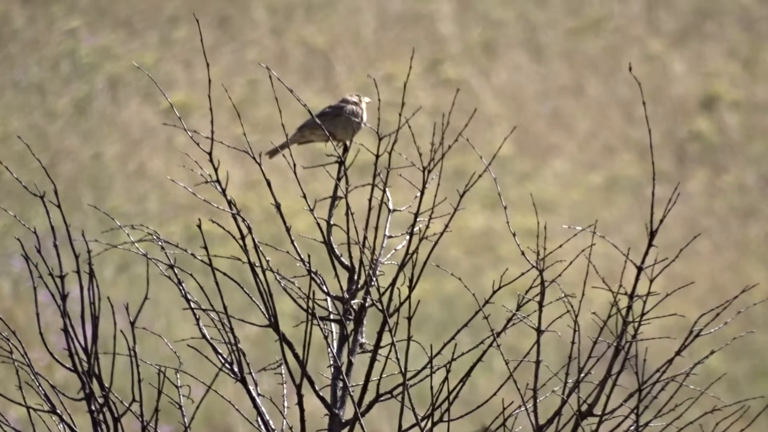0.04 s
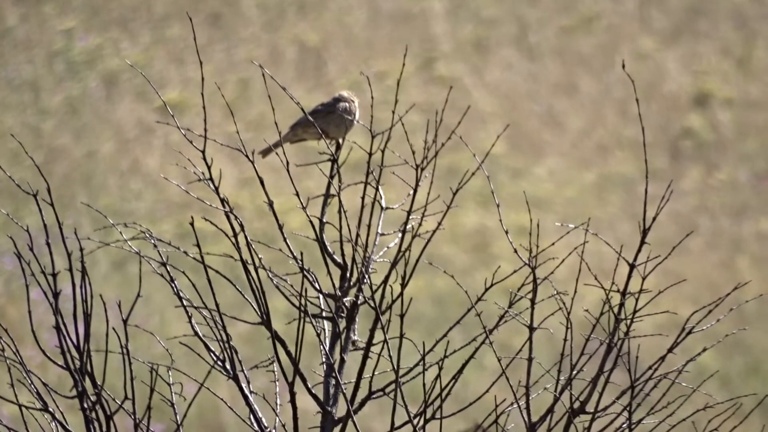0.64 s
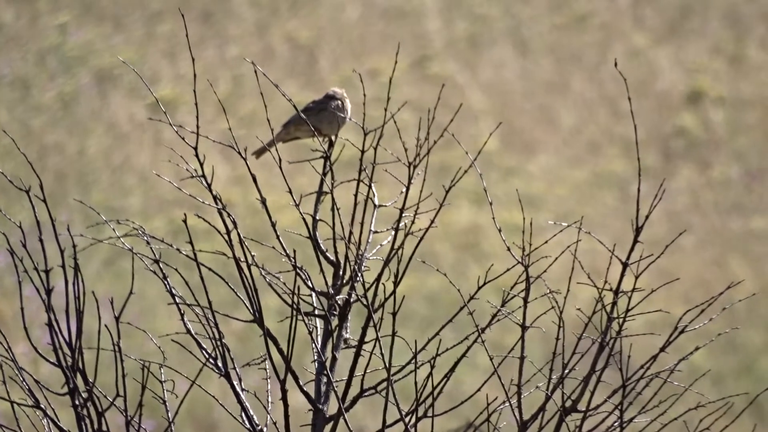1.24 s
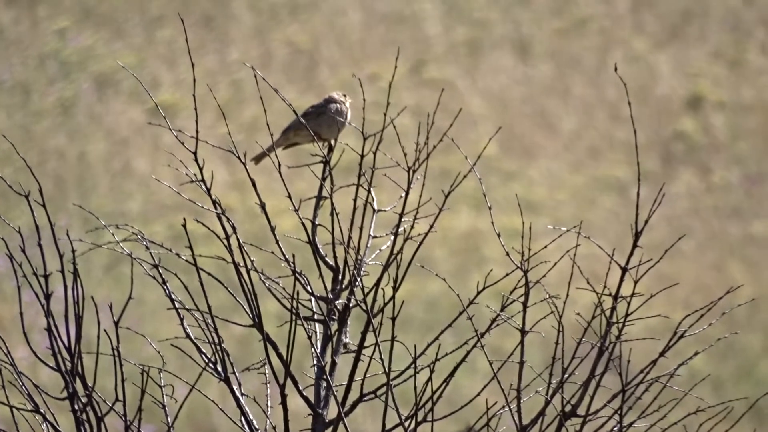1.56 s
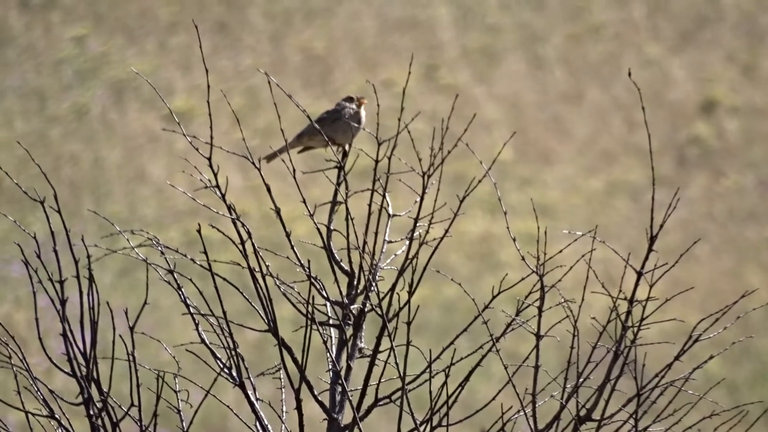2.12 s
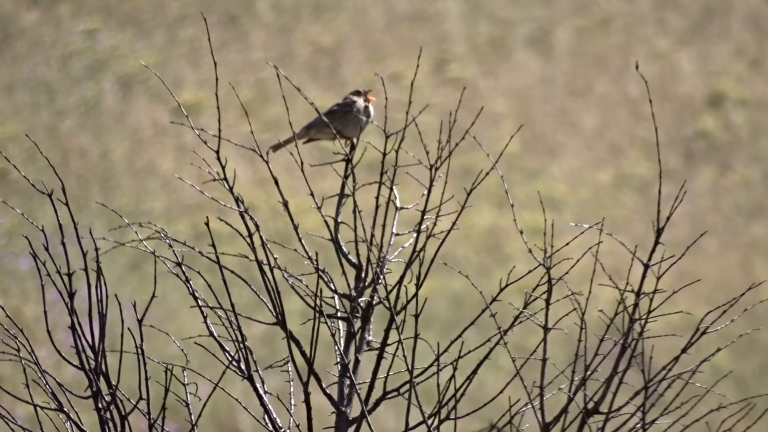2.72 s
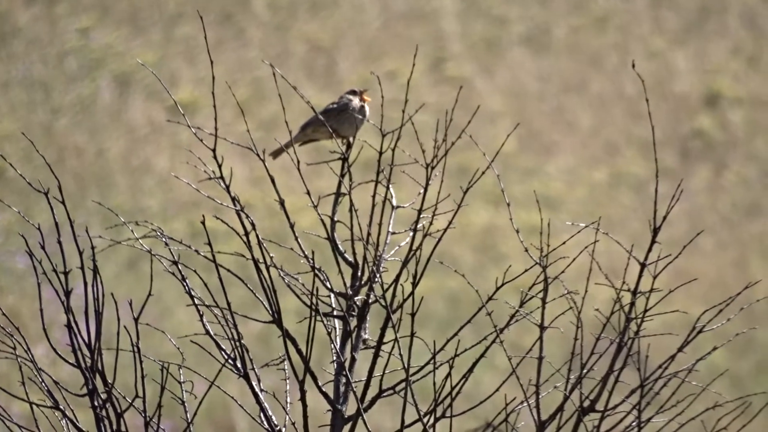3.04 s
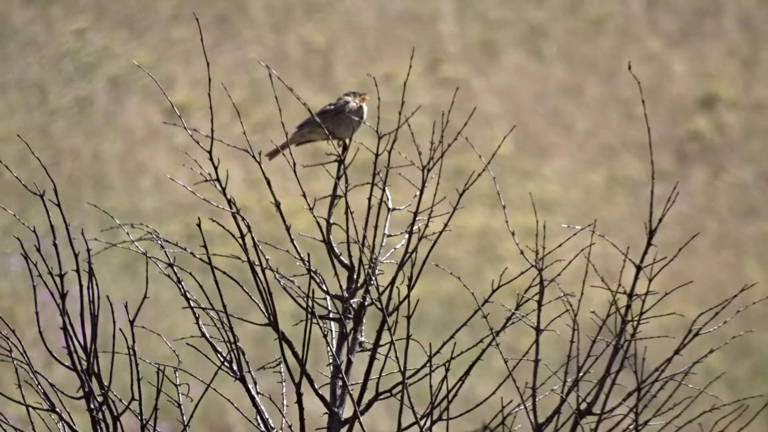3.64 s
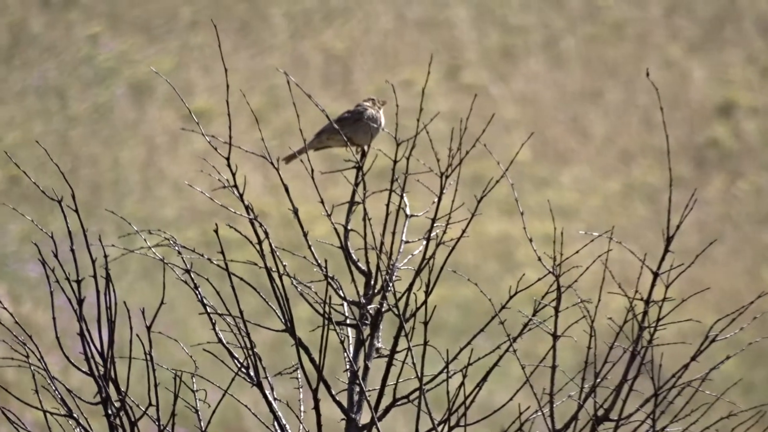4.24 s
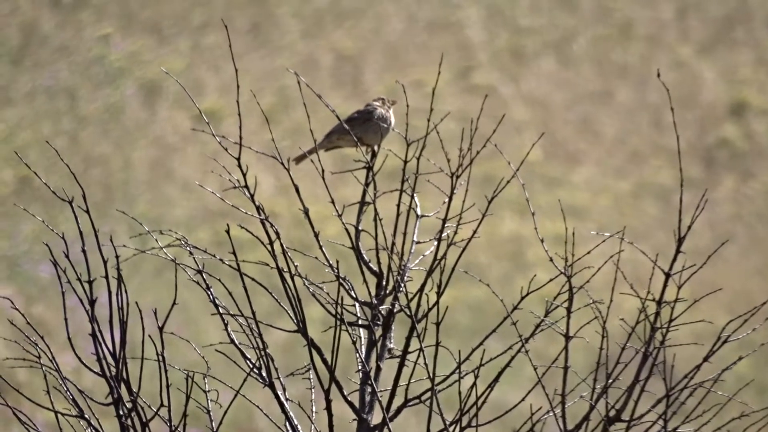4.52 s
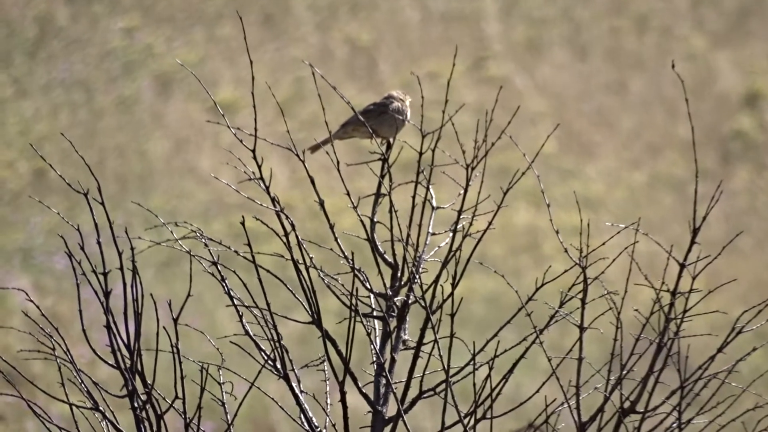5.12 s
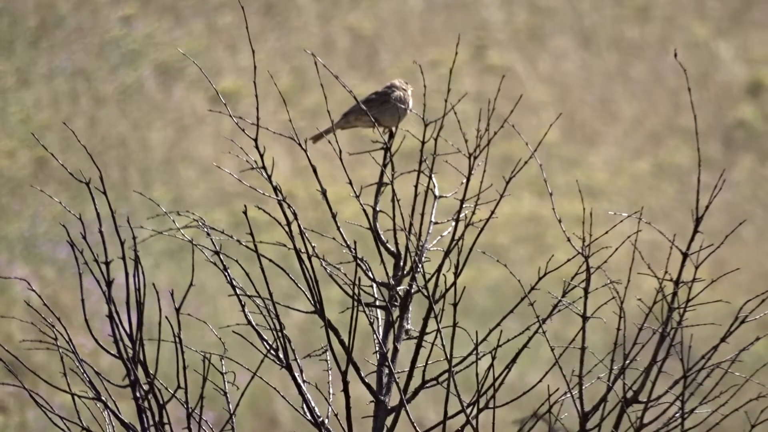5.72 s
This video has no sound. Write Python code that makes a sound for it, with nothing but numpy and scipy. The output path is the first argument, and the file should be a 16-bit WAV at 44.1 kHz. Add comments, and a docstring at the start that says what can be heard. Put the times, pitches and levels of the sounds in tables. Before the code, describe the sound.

A faint outdoor hush runs throughout. From the start, a bird slightly to the left gives short, warbling, sometimes hoarse whistles, with thin high calls farther off and light wind rumble around 1 second. At about 1.8 seconds a small bird in the centre begins single ticks that get faster and louder, turning into sharp chips at 2.6, a dry rattle from 2.8 to 3, and a softer buzzy jangle ending near 3.8. The whistler gives a quick trill around 4 seconds, a falling note just after, and a longer rising and falling whistle from 4.7 to 5.1. Gusts buffet the microphone with low thumps from about 4.4 to 5.1 seconds, strongest near 4.8. Distant birds twitter around 2.3 to 2.9 and again after 5, with a thin, very high jangle from 5.4 to 5.7. The birdsong carries a light outdoor echo.

```python
"""Corn bunting on a dry hillside

A corn bunting sings: single ticks speed up into chips, a rattle and a jangle. To its left a
starling-like bird whistles and trills with both sides of its syrinx; small birds twitter farther off.
Scrub scatters the songs, and gusts buffet the microphone."""
import sys
import numpy as np
from scipy import signal
from scipy.fft import rfft, irfft, next_fast_len
from scipy.io import wavfile
from scipy.ndimage import map_coordinates

SR = 44100
rng = np.random.default_rng(int(sys.argv[2]) if len(sys.argv) > 2 else 0)


def digitize_waveform(pressure):
    """Quantize a signal to 16-bit integers and store it at the path in sys.argv[1].

    Rows of a 2-D input are taken as channels; values are limited to [-1, 1].
    """
    field = np.atleast_2d(pressure).T
    bounded = np.clip(field, -1, 1)
    quanta = np.round(bounded * 32767).astype(np.int16)
    wavfile.write(sys.argv[1], SR, quanta)


N = 254456


def amp(db):
    """Decibels to gain."""
    return 10 ** (np.asarray(db) / 20)


def unit(x):
    """Scale to rms 1."""
    return x / np.sqrt(np.mean(x ** 2) + 1e-20)


def wobble(rate, size):
    """A smooth random curve, rate knots a second."""
    knots = rng.standard_normal(int(size * rate / SR) + 4)
    return map_coordinates(knots, [np.arange(size) * rate / SR])


def coloured(x, points):
    """EQ through (Hz, dB) points on a log axis."""
    size = next_fast_len(N + SR // 2)
    hz, db = np.transpose(points)
    gain = amp(np.interp(np.log(np.fft.rfftfreq(size, 1 / SR) + 1), np.log(hz + 1), db))
    return irfft(rfft(x, size) * gain, size)[..., :N]


def rush(spectrum, side_db):
    """Coloured stereo noise of rms 1."""
    mid, side = coloured(rng.standard_normal((2, N)), spectrum)
    return unit(np.array([mid + amp(side_db) * side, mid - amp(side_db) * side]))


def add(track, s, sound):
    """Mix a sound into a track at s seconds."""
    start = max(round(s * SR), 0)
    track[start:start + len(sound)] += sound[:max(N - start, 0)]


def tone(hz, octave_db):
    """A syrinx tone with a weaker octave above it."""
    phase = 2 * np.pi * np.cumsum(hz) / SR
    return np.sqrt(2) * (np.sin(phase) + amp(octave_db) * np.sin(2 * phase))


def gate(t, edge_s):
    """Soft opening and closing of a note."""
    return np.sin(np.pi / 2 * np.clip(np.minimum(t - t[0], t[-1] - t) / edge_s, 0, 1)) ** 2


def arc(u, hz):
    """A parabola through a start, middle and end pitch, for u from 0 to 1."""
    return np.polyval(np.polyfit([0, .5, 1], hz, 2), u)


def runs(rows, hurry=0, rise_hz=0):
    """Unroll runs into notes (s, dB, Hz); the level moves quickly at first, then settles."""
    out = []
    for first_s, last_s, count, first_db, last_db, hz in rows:
        u = np.linspace(0, 1, round(count))
        s = first_s + (last_s - first_s) * (u + hurry * u * (1 - u))
        db = last_db + (first_db - last_db) * (1 - u) ** 2 + 0.57 * rng.standard_normal(len(u))
        out += zip(s, db, hz + rise_hz * u)
    return out


def notes(rows, gesture, octave_db, rough):
    """Repeat one movement of the syrinx, with fresh pitch jitter each time."""
    track = np.zeros(N)
    knots, ratio, shape_db = np.transpose(sorted(gesture))
    t = np.arange(knots[0], knots[-1], 1 / SR)
    for s, db, hz in rows:
        pitch = hz * np.interp(t, knots, ratio) * (1 + rough * wobble(1460, len(t)))
        add(track, s + t[0], amp(db + np.interp(t, knots, shape_db)) * tone(pitch, octave_db))
    return track


def slurs(rows, buzz_hz, rough):
    """Notes that bend through three pitches; a fast flutter of the membrane makes some buzz."""
    track = np.zeros(N)
    for s, length, *hz, db, swing_hz in rows:
        t = np.arange(int(length * SR)) / SR
        flutter = np.sin(2 * np.pi * buzz_hz * t + wobble(158.3, len(t)))
        flutter *= 1 + 0.16 * wobble(190, len(t))
        pitch = (arc(t / length, hz) + swing_hz * flutter) * (1 + rough * wobble(286, len(t)))
        envelope = amp(db + 2.4 * wobble(139, len(t))) * gate(t, length / 5)
        add(track, s, envelope * tone(pitch, octave_db=-24.5))
    return track


def rasp(song, spectrum):
    """Dry, scratchy noise that rides the envelope of a song."""
    return np.abs(signal.hilbert(song)) * unit(coloured(rng.standard_normal(N), spectrum))


# Colour of the background air. Each row: frequency in Hz, gain in dB.
AIR_EQ = [(15, -27), (25, 2), (87, -5.5), (267, -17.5), (456, -7), (884, -9.5), (1140, -13.5), (2510, -14),
          (3000, -20.5), (11000, -28.5), (14300, -114), (22000, -120)]


def air():
    """The steady hush of open country."""
    return amp(-65) * rush(AIR_EQ, side_db=-2.5)


# Wind strength at the microphone. Each row: time in seconds, level in dB.
GUSTS = [(0.0, -92), (0.22, -55), (0.95, -46.5), (1.04, -59), (1.36, -49), (1.69, -73), (2.17, -69.5),
         (2.22, -53.5), (2.3, -65), (3.86, -69), (4.4, -47.5), (4.45, -47), (4.87, -38), (5.11, -50),
         (5.13, -46), (5.4, -71), (5.45, -49.5), (5.77, -69)]
# The strongest eddies. Each row: time of the crest in seconds, level in dB.
EDDIES = [(0.858, -41), (4.369, -33.5), (4.673, -29), (4.777, -29.5), (4.856, -30.5), (4.941, -32),
          (5.149, -41.5), (5.501, -49)]
# Colour of fast air. Each row: frequency in Hz, gain in dB.
BUFFET_EQ = [(12, -15), (20, -18), (54, -1), (125, 4.5), (190, -2), (270, -4.5), (465, -22.5), (517, -29),
             (821, -34), (1400, -33), (1820, -73), (3080, -120)]


def wind():
    """Gusts buffet the microphone; the strongest eddies swell and pass in a moment."""
    s, db = np.transpose(GUSTS)
    t = np.arange(N) / SR
    level = np.interp(t, s, db) + 3 * wobble(35, N)
    rumble_eq = [(10, -8.5), (35, 2.5), (80, 3), (180, -7.5), (350, -33.5), (1000, -52)]
    thump_eq = [(40, -2.5), (120, 9), (280, 4.5), (550, -10.5), (1300, -31.5), (4000, -50)]
    # faster air sheds smaller eddies, so strong gusts are brighter
    rumble = amp(level - 4 - 0.096 * (level - db.mean())) * rush(rumble_eq, side_db=-19)
    buffet = amp(level - 4.5 + 0.19 * (level - db.max())) * rush(BUFFET_EQ, side_db=3)
    swells = sum(amp(eddy_db - 4) / (1 + ((t - at) / .012) ** 2) for at, eddy_db in EDDIES)
    return rumble + buffet + swells * rush(thump_eq, side_db=2)


# Colour of the diffuse outdoor echo, with a ringing peak near 7.3 kHz.
# Each row: frequency in Hz, gain in dB.
ECHO_EQ = [(1000, -4), (2500, -3.5), (4500, 0), (6300, -4.5), (7300, 7), (8300, -3), (11000, 3)]


def outdoors(x, left_db, wet_db, t60):
    """A bird's direct sound and its diffuse outdoor echo, panned together."""
    t = np.arange(SR * 3 // 4) / SR
    mid, side = rng.standard_normal((2, len(t))) * amp(-60 * t / t60) * (1 - np.exp(-t / 0.00067))
    tail = np.array([mid + .5 * side, mid - .5 * side])
    echo = signal.fftconvolve(x[None], tail / np.linalg.norm(tail[0]), axes=1)[:, :N]
    return (x + amp(wet_db) * coloured(echo, ECHO_EQ)) * amp([[left_db / 2], [-left_db / 2]])


# Bouts of faint chatter. Each row: first and last start in seconds, note count, typical pitch in Hz,
# level in dB.
CHATTER_BOUTS = [(.385, 0.579, 4, 4670, -71.5), (1.763, 1.82, 2, 3440, -67.5), (5.429, 5.688, 8, 4650, -63)]


def chatter(length_s=.03, pitch_spread=.12):
    """Rows of loosely spaced twitter notes that bend at random."""
    rows = []
    for first_s, last_s, count, hz, db in CHATTER_BOUTS:
        for s in np.linspace(first_s, last_s, round(count)):
            late, loud, *bend = rng.standard_normal(5)
            pitches = hz * np.exp(pitch_spread * np.array(bend))
            rows.append((s + .008 * late, length_s, *pitches, db + 3.4 * loud))
    return rows


# The clearest distant notes. Each row: start and length in seconds, start, middle and end pitch in Hz,
# level in dB.
FAR_NOTES = [(0.498, 0.067, 5660, 5500, 5800, -69), (2.292, 0.037, 3400, 3260, 3000, -62.5),
             (2.357, 0.052, 3160, 3690, 4200, -61.5), (2.583, 0.042, 4140, 3750, 3330, -59),
             (2.646, 0.023, 2400, 1920, 1970, -59), (2.647, 0.045, 3990, 3290, 2660, -59),
             (2.688, 0.034, 2440, 2760, 2750, -61.5), (2.821, 0.057, 3340, 3210, 2720, -62.5),
             (2.893, .024, 3050, 3490, 3740, -60), (4.526, 0.022, 4850, 5740, 4360, -68.5),
             (4.588, 0.029, 3940, 4650, 4226, -65.5), (4.64, 0.068, 5950, 5530, 5780, -66),
             (5.034, 0.051, 4550, 4000, 3270, -58), (5.121, 0.023, 4870, 3460, 3140, -57),
             (5.315, 0.0422, 3390, 3160, 2820, -57), (5.37, .04, 2970, 3490, 3450, -58.5),
             (5.514, 0.037, 2930, 3620, 3830, -58.5), (5.571, 0.047, 4450, 4040, 3270, -56),
             (5.649, 0.045, 4720, 3150, 4300, -55.5)]
# Short rising peeps. Each row: start in seconds, level in dB.
FAR_PEEPS = [(5.405, -58.5), (5.423, -58.5), (5.477, -55.5), (5.496, -52.5), (5.558, -54.5), (5.573, -53),
             (5.644, -56), (5.661, -51)]
# One bird's thin, high call, always with the same dip. Each row: start in seconds, level in dB.
HIGH_CALLS = [(0.049, -65), (0.176, -65), (1.411, -70), (2.706, -63), (2.855, -61), (3.59, -62),
              (3.879, -68.5), (4.184, -65)]
# A thin jangle. Each row: first and last note in seconds, note count, first and last level in dB,
# pitch in Hz.
JANGLE_RUNS = [(5.38, 5.456, 5, -39, -44, 7400), (5.475, 5.532, 4, -46, -39.5, 6950),
               (5.552, 5.613, 4, -50.5, -40, 6900), (5.637, 5.68, 3, -62, -36, 6600)]
# One falling chip, shared with the bunting. Each row: offset in seconds, pitch ratio, level in dB.
CHIP_SHAPE = [(-.007, 1.22, -20), (-.002, 1.12, -13.5), (.002, 1, -3), (.005, .9, -10.5), (.009, 0.88, -27)]


def far_birds():
    """Twittering and thin high calls from across the slope, mixed with the bunting's light, scratchy jangle."""
    peep_s, peep_hz = 0.0159, (2360, 2710, 2830)
    call_s, call_hz = .1, (7580, 7040, 7316)
    peeps = [(s, peep_s, *peep_hz, db) for s, db in FAR_PEEPS]
    twitter_rows = [(*row, 45) for row in FAR_NOTES + peeps + chatter()]  # 45 Hz of buzz swing
    twitter = slurs(twitter_rows, buzz_hz=131, rough=0.016)
    calls = slurs([(s, call_s, *call_hz, db, 0) for s, db in HIGH_CALLS], buzz_hz=0, rough=0.0108)
    shallow_chip = [(s, ratio ** 0.95, db) for s, ratio, db in CHIP_SHAPE]
    jangle = amp(-4) * notes(runs(JANGLE_RUNS), shallow_chip, octave_db=-32, rough=0.029)
    scratch = rasp(jangle, [(7000, -22), (10000, -10)])
    return amp(1) * twitter + amp(-1) * calls + jangle + amp(-12) * scratch


def whistle(t, glide, db, rate, swing, tremolo_db):
    """One side of the syrinx as a rotating phasor, warbling around its glide."""
    turn = 2 * np.pi * rate * (t - t[0]) + .5 * wobble(29.76, len(t))
    # each warble creeps up and drops back faster; positive tremolo accents the drop
    warble = np.sin(turn) - np.sin(2 * turn) / 2
    hoarse = 0.32 * swing * wobble(900, len(t))
    pitch = glide * (1 + swing * warble + hoarse + 0.0075 * wobble(393.7, len(t)))
    level = db - tremolo_db * np.cos(turn) + (1.57 + 22 * swing) * wobble(146.7, len(t))
    envelope = np.sqrt(2) * amp(level) * gate(t, 0.0049 + 0.25 * swing)
    track = np.zeros(N, complex)
    add(track, t[0], envelope * np.exp(2j * np.pi * np.cumsum(pitch) / SR))
    return track


# The whistler's two-voiced syllables. Each row: start and length in seconds, the low side's (start,
# middle, end) pitch in Hz, the high side's (first, last) ratio to it, (level in dB, crest as a share
# of the length) for low then high, warble as (rate in Hz, swing as a share of pitch, tremolo in dB).
DUET_SYLLABLES = [(0.066, 0.23, (1650, 1900, 2360), (2.03, 1.87), (-47.5, 1), (-71.5, 0.083),
                  (37, 0.0092, .3)), (.31, 0.19, (2300, 2240, 2160), (1.36, 1.17), (-61, 0.66),
                  (-55.5, 0.4), (61, 0.047, 5.5)), (.655, 0.13, (1500, 1520, 1790), (1.56, 1.19),
                  (-54.5, 1), (-59, .65), (69, 0.031, 3)), (.762, 0.19, (1720, 1913, 1630), (1.33, 1.62),
                  (-44.5, 0.81), (-50.5, 0.068), (51, 0.0088, 1.5)), (1.108, 0.32, (2100, 2003, 1860),
                  (1.91, 2.01), (-54, 0.39), (-51, 0.49), (44.8, 0.059, 1.4)),
                  (1.468, 0.24, (2720, 2410, 1950), (1.71, 1.68), (-48.5, 0.33), (-49, .68),
                  (53, 0.0056, .4)), (1.944, 0.1, (1480, 1680, 1330), (1.36, 1.43), (-55.5, 0.52),
                  (-49, 0.58), (54.7, 0.013, 1)), (2.039, 0.1, (1600, 1215, 1670), (2.03, 1.94),
                  (-61, 0.37), (-54, 0.51), (53.4, 0.009, 0.78)), (2.134, 0.098, (1540, 1800, 1580),
                  (1.505, 1.35), (-46, 0.67), (-46.5, 0.12), (52.5, 0.006, .5)),
                  (2.408, 0.1, (2800, 2600, 1870), (1.41, 1.37), (-44.5, 0.75), (-47.5, 0.23),
                  (55, 0.03, 4.4)), (3.257, 0.0757, (1700, 1930, 2040), (1.3, 1.23), (-50.5, .7),
                  (-46.5, 1), (74, 0.05, 3.7)), (3.328, .078, (2380, 2160, 2000), (1.44, 1.6), (-45, 0.75),
                  (-60, 0.26), (58, 0.0037, .5)), (3.588, .115, (1830, 1840, 1650), (1.38, 1.3),
                  (-60.5, 0.25), (-58.5, .3), (55.7, 0.014, 1)), (3.883, 0.057, (2170, 2480, 2400),
                  (1.31, 1.25), (-56, 0.82), (-52, 0.76), (56, 0.0065, 1)),
                  (4.172, .152, (2124, 1923, 1750), (1.21, 1.29), (-39, 0.28), (-44.5, 0.6),
                  (56, 0.0046, 0.74))]


def syllable(s, length, hz, interval, low, high, warble):
    """Both sides of the syrinx follow one arc an interval apart, each swelling to its own crest."""
    rate, swing, tremolo_db = warble
    t = np.arange(s, s + length, 1 / SR)
    u = (t - s) / length
    swell = lambda db, crest, fade_db: db - fade_db * np.abs(u - crest)
    scoop = 1 - 0.0944 * np.exp(-(t - s) / 0.0072)  # slides in from a little below
    low_hz = arc(u, hz) * scoop
    high_hz = low_hz * np.interp(u, [0, 1], interval)
    return (whistle(t, low_hz, swell(*low, fade_db=22.5), rate, 0.94 * swing, tremolo_db)
            + whistle(t, high_hz, swell(*high, fade_db=18.5), rate, swing, tremolo_db))


# The whistler's trill. Each row: first and last pulse in seconds, pulse count, first and last level
# in dB, starting pitch in Hz.
TRILL_RUNS = [(3.9125, 4.0795, 9, -45.5, -39.5, 2402)]
# One pulse of it. Each row: offset in seconds, pitch ratio, level in dB.
PULSE_SHAPE = [(-.008, 1.12, -14.5), (-.002, .99, -14), (.002, 1.015, 4.5), (.006, 1.06, -2.5),
               (0.009, 0.885, -24)]


def trill():
    """The two sides of the syrinx alternate in pulses that quicken and climb."""
    low_pulses = runs(TRILL_RUNS, hurry=.08, rise_hz=222.5)
    high_pulses = [(s + .005, db, hz * 1.28) for s, db, hz in low_pulses]
    low = amp(-3) * notes(low_pulses, PULSE_SHAPE, octave_db=-34, rough=0.016)
    high = amp(-13) * notes(high_pulses, PULSE_SHAPE, octave_db=-7.5, rough=0.02)
    return low + high


# The whistler's closing note. Each row: time in seconds, pitch in Hz, level in dB.
ARCH_CURVE = [(4.748, 1617, -56), (4.772, 1895, -46.5), (4.798, 2216, -55), (4.81, 2304, -44),
              (4.856, 2610, -47), (4.912, 2693, -51.5), (4.972, 2702, -50), (5.028, 2683, -42),
              (5.08, 2400, -43.5), (5.098, 2183, -54), (5.108, 2060, -44), (5.128, 1856, -50.5),
              (5.135, 1790, -53)]


def arch():
    """A long whistle on one side alone rises and falls, quavering most at the start."""
    s, hz, db = np.transpose(ARCH_CURVE)
    t = np.arange(s[0] - .004, s[-1] + 0.0055, 1 / SR)
    return whistle(t, np.interp(t, s, hz), np.interp(t, s, db),
                   rate=59, swing=0.015, tremolo_db=np.linspace(5.5, -2, len(t)))


# How hard the whistler presses its voice. Each row: time in seconds, overtone level in dB.
STRAIN_CURVE = [(.15, -30), (.35, -41.5), (.9, -33), (1.2, -14.5), (1.6, -10), (2, -19), (2.2, -28),
                (2.45, -14), (3.6, -22), (4.25, -28.5), (5, -30.5)]
# Colour of its overtones. Each row: frequency in Hz, gain in dB.
THROAT_EQ = [(2600, -11), (3400, -4), (5200, -5.5), (6200, -9), (7200, 1.5), (8600, 0), (11000, -7.5)]


def whistler():
    """The two sides of the syrinx load each other, adding overtones and sum tones to the song."""
    syllables = sum(syllable(*row) for row in DUET_SYLLABLES)
    voice = amp(-0.9) * syllables + signal.hilbert(trill()) + amp(1) * arch()
    envelope, phase = np.abs(voice), np.angle(voice)
    fray = rng.standard_normal(N) / 2
    overtones = np.cos(2 * phase) + amp(-6.5) * (np.cos(3 * phase) + np.cos(4 * phase))
    strain_db = np.interp(np.arange(N) / SR, *np.transpose(STRAIN_CURVE))
    return voice.real + amp(strain_db) * coloured(envelope * (overtones + fray), THROAT_EQ)


# One tick, and one rising flick of the rattle. Each row: offset in seconds, pitch ratio, level in dB.
TICK_SHAPE = [(-.01, 0.91, -20), (-.004, 1.03, -14.5), (0, 1.22, -12.5), (.001, 0.966, -1),
              (.002, 1.048, -5), (.0035, 0.815, -9.5), (.0055, 1.28, -22.5), (.007, 1.013, -3),
              (.009, 0.8, -21), (0.011, 0.39, -13)]
FLICK_SHAPE = [(-.006, .9, -23), (-.002, 0.907, -11), (.0005, 0.798, -9), (.002, 1.067, 1),
               (.0035, 1.14, -3.5), (.006, 1.57, -24.5)]
# Opening ticks, closer and louder as the bunting warms up. Each row: time in seconds, level in dB.
OPENING_TICKS = [(1.8037, -54), (2.003, -50), (2.1636, -40.5), (2.297, -37.5), (2.4037, -37),
                 (2.4838, -35.5), (2.5585, -36)]
# Evenly spaced chips, and the rattle. Each row: first and last note in seconds, note count, first and
# last level in dB, pitch in Hz.
CHIP_RUNS = [(2.6187, 2.7546, 4, -33, -35, 5960), (3.0848, 3.1315, 5, -40, -35, 5970),
             (3.246, 3.246, 1, -45, -40, 5480), (3.33, 3.3564, 3, -48.5, -41.5, 5700),
             (3.3724, 3.3834, 2, -43, -38.5, 5850), (3.3984, 3.4258, 3, -44, -40.5, 5650),
             (3.644, 3.706, 6, -50.5, -45, 5240)]
RATTLE_RUNS = [(2.8128, 3.0275, 15, -42, -36.5, 5890)]
# High pips between the chips. Each row: start in seconds, level in dB.
HIGH_PIPS = [(3.144, -49.5), (3.349, -49.5), (3.392, -49.5), (3.436, -50)]
# Buzzes and falling slurs. Each row: start and length in seconds, start, middle and end pitch in Hz,
# level in dB, buzz swing in Hz.
BUZZY_SLURS = [(3.164, 0.044, 4660, 4880, 5120, -53, 447), (3.253, 0.052, 4950, 4880, 4940, -52, 444),
               (3.455, .013, 5900, 5550, 5460, -49.5, -2), (3.465, 0.072, 5600, 5520, 5250, -50, 483),
               (3.57, 0.039, 5620, 4790, 4870, -49.5, -2), (3.724, .013, 6900, 5880, 5140, -49, 2),
               (3.733, 0.025, 5200, 4750, 4900, -53.5, 0)]


def bunting():
    """One strophe of ticks, chips, rattle, pips and slurs, frayed by turbulence in the syrinx."""
    tick_hz, pip_s, pip_hz = 5630, 0.013, (7570, 7130, 6930)
    tick_rows = [(s, db, tick_hz) for s, db in OPENING_TICKS]
    pip_rows = [(s, pip_s, *pip_hz, db, 0) for s, db in HIGH_PIPS]
    ticks = amp(-1) * notes(tick_rows, TICK_SHAPE, octave_db=-22, rough=0.028)
    chips = notes(runs(CHIP_RUNS), CHIP_SHAPE, octave_db=-28, rough=0.014)
    rattle = amp(-7) * notes(runs(RATTLE_RUNS), FLICK_SHAPE, octave_db=-13.5, rough=0.017)
    song = ticks + chips + rattle + slurs(BUZZY_SLURS + pip_rows, buzz_hz=310, rough=0.0083)
    return song + amp(-15) * rasp(song, [(2000, -52), (5000, 7), (10500, -12.5)])


def scene():
    """Two near singers and the far birds over the wind and the hush of open country."""
    birds = outdoors(bunting(), left_db=-0.9, wet_db=-10.5, t60=1.0)
    birds += outdoors(whistler(), left_db=5, wet_db=-8, t60=0.76)
    birds += outdoors(far_birds(), left_db=3, wet_db=-4.5, t60=0.42)
    return birds + wind() + air()


def record(dry):
    """A brick-wall low-pass takes off the top of the mix."""
    top_hz = 11200
    size = next_fast_len(N + SR // 2)
    return irfft(rfft(dry, size) * (np.fft.rfftfreq(size, 1 / SR) < top_hz), size)[:, :N]


dry = scene()
out = record(dry)
digitize_waveform(out)
```